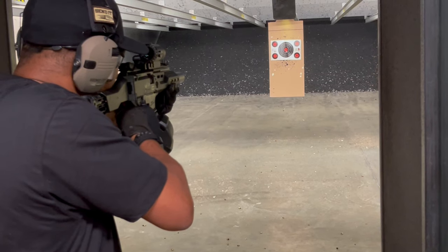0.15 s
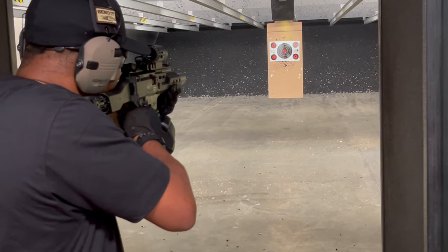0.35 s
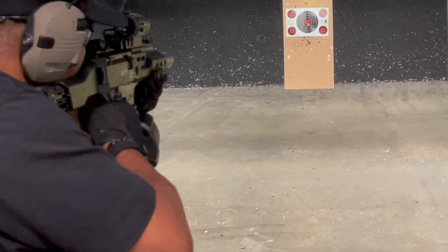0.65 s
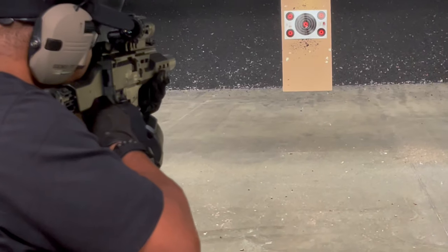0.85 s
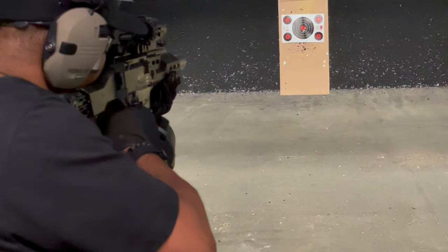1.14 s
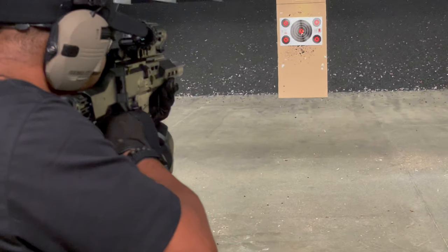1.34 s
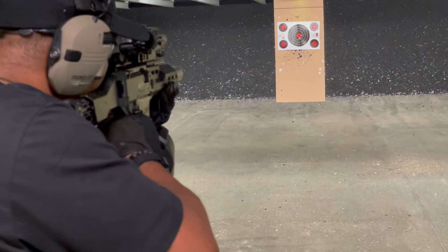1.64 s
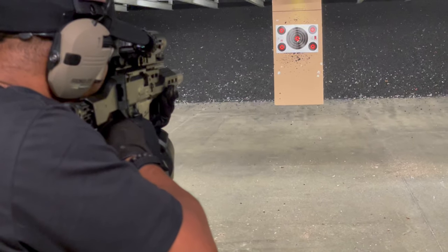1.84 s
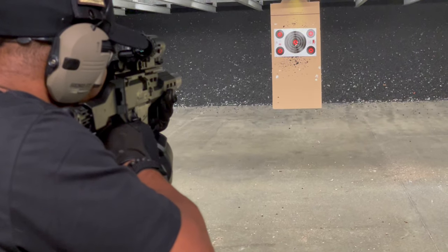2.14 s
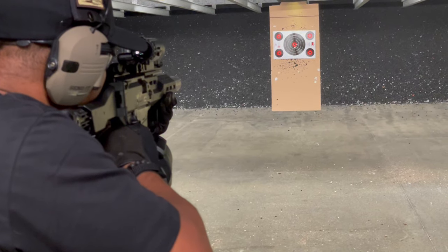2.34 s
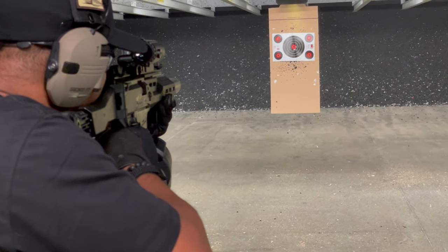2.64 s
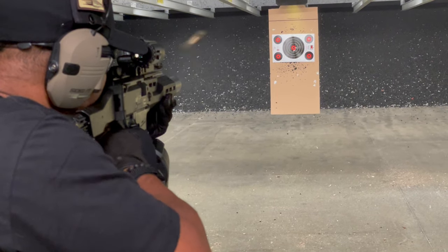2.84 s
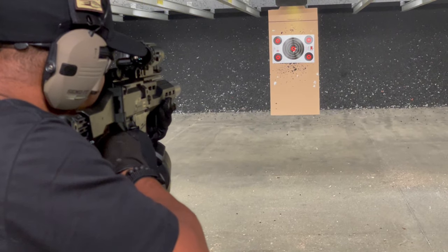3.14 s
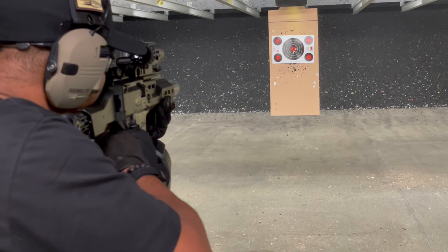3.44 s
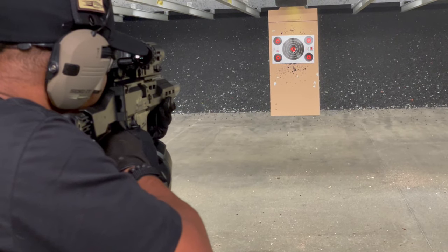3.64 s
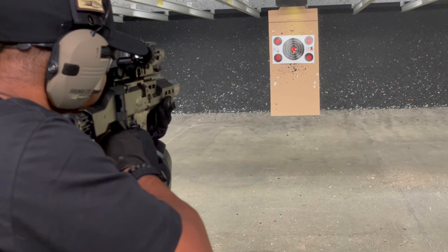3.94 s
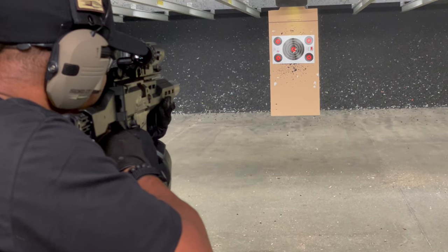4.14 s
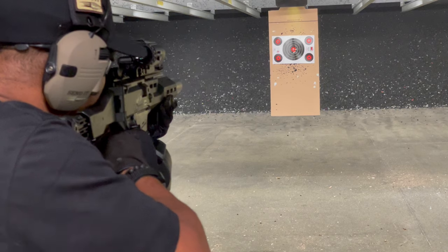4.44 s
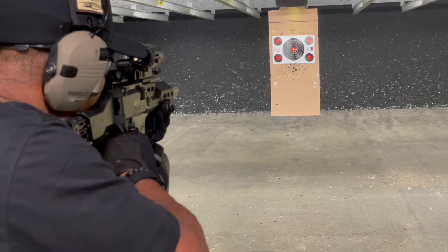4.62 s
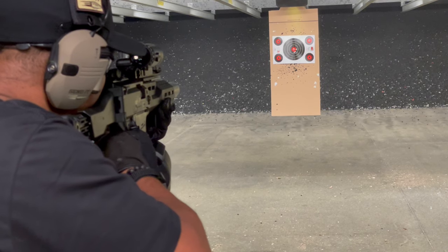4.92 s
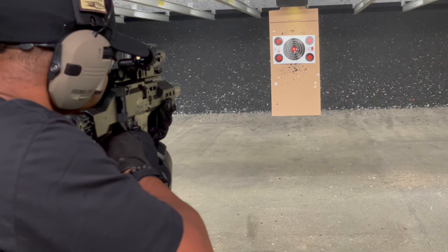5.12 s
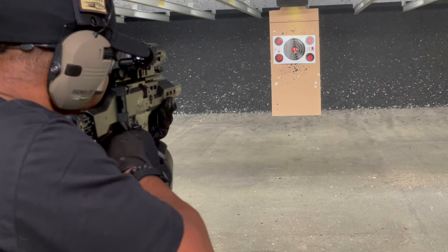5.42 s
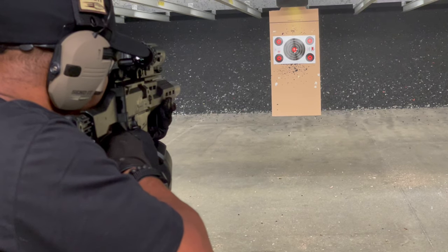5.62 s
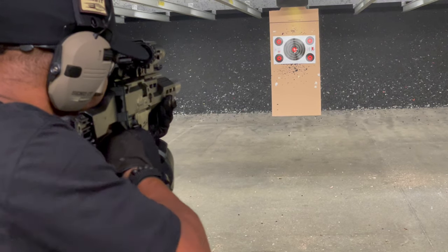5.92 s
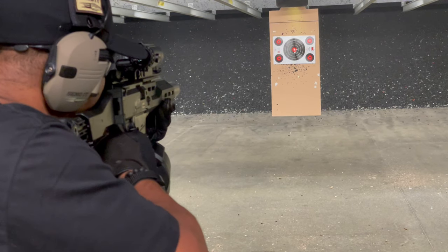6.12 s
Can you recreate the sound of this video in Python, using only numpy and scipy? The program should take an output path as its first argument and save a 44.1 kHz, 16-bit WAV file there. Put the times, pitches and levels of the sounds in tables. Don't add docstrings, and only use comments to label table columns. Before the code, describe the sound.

A hard, reverberant indoor shooting range, heard from beside the shooter on overloading stereo microphones, with low ventilation rush and fan hum throughout. At the start the tail of an earlier shot dies away while brass clicks on the floor and knocks a bench around 0.1 s, with smaller ticks to 0.55. A gun in another lane fires at 0.86, the near carbine cracks at 1.05, and the lane gun again at 1.16. Echoes slap and boom, then cases tick and ring brightly from 1.6 to 2.4. The carbine fires louder at 2.84, the lane gun at 3.0; high brass singing follows from 3.3, and a case rolls with a thin scrape at 4.0 to 4.3. The carbine fires at 4.36, slightly softer, then the lane gun at 4.74. More pings and a heavier clack fall at 5.0 to 5.8, before the final near blast at 5.88 rings out to the end.

```python
import sys
import numpy as np
from scipy import signal
from scipy.fft import rfft, irfft, next_fast_len
from scipy.io import wavfile
from scipy.ndimage import uniform_filter1d, map_coordinates

SR = 44100
rng = np.random.default_rng(int(sys.argv[2]) if len(sys.argv) > 2 else 0)


def persist_wave(psi):
    counts = np.round(np.clip(psi, -1, 1) * 32767).astype(np.int16)
    wavfile.write(sys.argv[1], SR, np.atleast_2d(counts).T)


def boost(x):
    u = np.asarray(x, float) / 20
    return 10 ** u


N = 276507

# (frequency [Hz], density [dB/Hz])
AIR_SPECTRUM = [(15, -60.5), (25, -30.5), (55, -5.5), (82, -9.5), (97, -19), (130, -17.5), (241, -22),
                (266, -32.5), (385, -31), (911, -37), (981, -39), (1320, -38.5), (9000, -64),
                (11700, -97.5), (19800, -120)]
# (frequency [Hz], level [dB])
FAN_ORDERS = [(64.6, -57), (129.2, -54.5), (193.8, -61.5), (387.6, -72), (608.3, -77.5), (958.2, -72)]

# (time [s], strength [dB])
NEAR_SHOTS = [
    (1.0536, -5),
    (2.838, -3.5),
    (4.3571, -5.5),
    (5.877, -3.5),
]
LANE_SHOTS = [
    (-.55, -3.5),
    (0.864, -4),
    (1.156, -5.5),
    (3.006, -5),
    (4.740, -3),
]
# (delay [s], level [dB], t60 [s], tilt [dB/octave])
NEAR_WALLS = [
    (0, -2, 0.13, 4),
    (.003, 7, .066, -1.5),
    (.0512, 3, .03, 0),
    (.055, 0, 0.053, 0.5),
    (.066, -17.5, 0.027, -4.5),
    (.1, -9.5, .07, 0),
    (0.138, -16, 0.22, 1.2),
]
LANE_WALLS = [
    (0, 9, 0.057, 1),
    (.007, 2.5, 0.16, 1),
    (.048, -13, 0.19, -0.5),
    (0.098, -25, 0.15, 0),
    (.175, -24.5, .3, -2.5),
    (0.204, -34.5, 0.13, -2),
]
# (frequency [Hz], density [dB/Hz])
NEAR_BLAST = [(24, -41), (40, -1), (85, 3), (150, -6), (234, -0.5), (580, -6.5), (1200, -7.5),
              (1570, -14.5), (1680, -11), (2960, -12.5), (9000, -18), (11700, -48), (19800, -120)]
LANE_BLAST = [(24, -29.5), (40, 6), (219, -1.5), (287, 1), (744, 0), (1090, -4), (1340, -5), (2900, -12.5),
              (9000, -17), (11700, -47), (19800, -120)]
# (frequency [Hz], density [dB/Hz])
NEAR_HALL = [(24, -42.5), (40, -4), (81, -10.5), (136, -10.5), (245, -3), (377, -4.5), (442, -3), (779, -5),
             (977, -7.5), (1970, -3.5), (2900, -5.5), (3800, -13.5), (9000, -14.5), (11700, -43),
             (19800, -120)]
LANE_HALL = [(24, -39), (40, -11), (81, -8.5), (174, -11), (229, -6.5), (262, -9.5), (452, -0.5),
             (933, -10.5), (1020, -13.5), (2110, -15), (9000, -26.5), (11700, -64), (19800, -120)]
# (frequency [Hz], t60 [s])
HALL_T60 = [(60, 1.5), (200, 1.1), (500, 0.84), (1200, 0.95), (3000, 0.68), (7000, 0.61), (12000, 0.48)]
# (frequency [Hz], level [dB], t60 [s])
BOOM_MODES = [(56.6, -25.5, 0.88), (82, -22.5, 1), (195.4, -25, 0.15)]
THUMP_S, THUMP_HZ, THUMP_T60_S, SINK_S = .0545, 81.6, 0.083, .006

# (struck [s], level [dB], flight [s])
SHORT_FLIGHTS = [(0, -83, 0.044), (.066, -67, 0.034), (.358, -68.5, .12), (1.559, -74, .05),
                 (1.615, -76, 0.23), (1.825, -62, 0.15), (2.0, -78, .1), (2.177, -67.5, .12),
                 (2.38, -59, 0.099), (2.476, -63, 0.11), (2.553, -67, .16), (2.74, -82.5, 0.086),
                 (3.334, -57, 0.22), (3.559, -58.5, .12), (3.73, -70, .08), (3.817, -67, 0.064),
                 (3.947, -62, 0.096), (5.058, -61.5, 0.12), (5.211, -67, 0.073), (5.275, -69, .16),
                 (5.44, -62, 0.12), (5.541, -66.5, 0.091)]
# (struck [s], level [dB], flight [s])
LONG_FLIGHTS = [(3.63, -73, 0.046), (4.985, -56.5, .12), (5.285, -68.5, .1), (5.385, -63, 0.042),
                (5.43, -55.5, 0.13), (5.572, -54, 0.082), (5.67, -62.5, .14)]
SHORT_HZ, LONG_HZ = 9800, 11770
SING_ATTACK_S, SING_T60_S, LANDING_S = 0.0013, 0.38, .012

# (time [s], peak [dB], tick centre [Hz], left-right [dB], thud [dB])
TICKS = [(0.07, -26, 6260, 2, -2.5), (0.1076, -31, 2740, -0.5, -2), (0.266, -55, 3870, 5, 5),
         (0.553, -49, 2190, -5, -6), (1.6149, -25.5, 6460, -3, -19), (1.8256, -23.5, 7900, 3, 2),
         (1.9157, -36.5, 4300, 2.5, 11.5), (2.1099, -30, 5870, 2.5, -3.5), (2.2672, -44.5, 3180, -1.0, -6),
         (2.3608, -42, 1303, 0.0, -5), (3.905, -28, 6900, 2, -7), (5.223, -22.5, 2530, 2, 1),
         (5.5426, -29, 6300, 2.5, -5)]
# (time [s], peak [dB], tick centre [Hz])
RIM_TICKS = [(0.338, -28, 10500), (0.5044, -52, 11500), (0.5117, -62, 11500), (1.329, -25, 7000),
             (1.719, -62.5, 9800), (2.154, -39.5, 9780), (2.3121, -39, 11460), (3.5583, -57, 9730),
             (3.686, -27, 11700), (3.9476, -35, 11150), (5.0592, -40.5, 9770), (5.1871, -52, 10930),
             (5.384, -54.5, 9900), (5.44, -40.5, 9640), (5.8128, -39, 11600)]
# (time [s], peak [dB], frequency [Hz], t60 [s])
RINGS = [(0.114, -43.5, 11620, 0.23), (0.511, -58, 11700, 0.27), (1.616, -69, 11300, 0.2),
         (1.918, -52, 11400, 0.3), (2.3112, -41, 11440, 0.28), (2.3301, -33, 11380, 0.077),
         (3.6849, -31, 11570, 0.188), (3.6985, -43, 11230, 0.089), (5.574, -54, 11750, 0.18),
         (5.8137, -38.5, 11520, 0.15)]
# (frequency [Hz], level [dB], t60 [s])
BENCH_MODES = [(1300, -13, 0.12), (2150, 0, 0.04), (2630, -4, 0.079), (3881, -15, 0.15), (3978, -17, 0.31)]
TICK_T60_S, RIM_T60_S, THUD_HZ = 0.057, .065, 1700
BOOTH_S, ECHO_T60_S = .007, .3
HEAVY_LASTS = 0.15
RIM_THUD_DB, THUD_FROM_DB, THUD_GROWS = -21, -49, 0.62

# (frequency [Hz], width [Hz], level [dB])
ROLL_MODES = [(3700, 60, -4), (4900, 60, 0), (6130, 27, -1.5), (6170, 130, -1), (7490, 67, 1),
              (8700, 65, 3.5), (9750, 27, -3), (11150, 250, -6.5)]
ROLL_FROM_S, ROLL_TO_S, ROLL_STOP_S = 3.995, 4.28, .03
ROLL_DB, ROLL_GROWS_DB_PER_S = -75, 12
TURN_S, TURN_AT_S = .043, .027

# (frequency [Hz], correlation [0-1])
LIKENESS = [(30, .8), (60, .84), (150, .88), (300, .86), (700, .85), (1400, .68), (2100, .9), (4500, .93),
            (5500, .995), (8300, .99), (9000, .85), (10300, .97), (12500, .9), (14000, .4)]
# (frequency [Hz], gain [dB])
MIC_RESPONSE = [(30, -10), (60, -1.5), (9000, 1.5), (11000, 4), (11800, -0.5), (12600, -6.5),
                (13300, -13.5), (15500, -13), (15800, -33.5)]
# (frequency [Hz], phase [rad])
PORT_LEAD = [(2000, 0), (3300, -.55), (5000, -.3), (5500, 0), (8500, 0), (9000, .6), (9650, 2.2),
             (10200, 3.15), (11000, 4.6), (11700, 5.9), (12400, 6.5), (13800, 9.4)]
SWELL_GRID_S, SWELL_GRID_START_S, LEAST_SWELL_S = 1024 / 48000, .0094, .005
SWELL_DB, SWELL_DB_PER_S = -37, 250


def unit(x):
    return x / np.sqrt(np.mean(x ** 2) + 1e-20)


def along(points, hz):
    f, v = np.transpose(points)
    return np.interp(np.log(hz + 1), np.log(f + 1), v)


def filtered(x, response):
    m = next_fast_len(x.shape[-1] + 4096)
    return irfft(rfft(x, m) * response(np.fft.rfftfreq(m, 1 / SR)), m)[..., :x.shape[-1]]


def stereo(pair):
    def mid_side(hz):
        turn = np.arccos(np.clip(along(LIKENESS, hz), -1, 1)) / 2
        return np.array([np.cos(turn), np.sin(turn)])

    mid, side = filtered(pair, mid_side)
    return np.array([mid + side, mid - side])


def add(out, x, s):
    i = round(s * SR)
    part = x[:, max(-i, 0):N - i]
    out[:, max(i, 0):max(i, 0) + part.shape[1]] += part


def spell(start, length, attack, release):
    t = np.arange(N) / SR - start
    opening = 1 - np.exp(-np.clip(t, 0, 1) / attack)
    return t, opening * np.exp(-(np.clip(t - length, 0, 1) / release) ** 2)


def ventilation():
    def colour(hz):
        whistle_db = 1.9 * np.exp(-((hz - 4000) / 500) ** 2)
        return boost(along(AIR_SPECTRUM, hz) + whistle_db)

    rush = unit(filtered(stereo(rng.standard_normal((2, N))), colour))
    t = np.arange(N) / SR
    drift = np.cumsum(rng.normal(0, 0.016, (len(FAN_ORDERS), N)), axis=1)
    ears = np.array([[.3], [-.3]])
    hum = sum(boost(db + 1.0) * np.sin(2 * np.pi * hz * t + d + ears)
              for (hz, db), d in zip(FAN_ORDERS, drift))
    return boost(-50.5) * rush + hum


def wall_returns(walls, hz, t):
    rise_s = .0004 + 1.6 / hz
    total = 0
    for delay, db, t60, tilt in walls:
        since = abs(t - delay)
        level_db = db + tilt * np.log2(hz / 2000)
        decay_db = 60 * (since / (t60 * (hz / 2000) ** -.12)) ** 1.157
        total = total + (t > delay) * boost(level_db - decay_db) * (1 - np.exp(-since / rise_s))
    return total


def low_boom(t, boom_db, thump_db):
    ears = np.array([[.33], [-.33]])
    boom = sum(boost(boom_db + db - 60 * t / t60) * np.sin(2 * np.pi * hz * t + ears)
               for hz, db, t60 in BOOM_MODES)
    late = np.clip(t - THUMP_S, 0, None)
    sunk = late + SINK_S * (1 - np.exp(-late / 0.0025))
    thump = boost(thump_db - 60 * late / THUMP_T60_S) * np.sin(2 * np.pi * THUMP_HZ * sunk)
    return boom * (1 - np.exp(-t / 0.012)) - thump


def gun(shots, walls, blast, hall, hall_db, boom_db, thump_db, fresh, swell, grain_db):
    def coloured(spectrum, x):
        return unit(filtered(x, lambda hz: boost(along(spectrum[:-2], hz))))

    out, t = np.zeros((2, N)), np.arange(4 * SR // 3) / SR
    centres = 45 * 2.0 ** np.arange(9)
    paths = rng.standard_normal((2, 2, len(t)))
    lumps = boost(grain_db * np.tanh(map_coordinates(rng.standard_normal(400), [t * 220])))
    shapes = []
    for hz in centres:
        uneven_db = 1.6 * map_coordinates(rng.standard_normal(60), [t * 35])
        tail = boost(uneven_db + hall_db - 60 * t / along(HALL_T60, hz))
        shapes.append([lumps * wall_returns(walls, hz, t), tail * (1 - np.exp(-(t / swell) ** 2))])
    boom = low_boom(t, boom_db, thump_db)
    octave = np.log2(np.clip(np.fft.rfftfreq(len(t), 1 / SR), centres[0], centres[-1]))
    for s, db in shots:
        noise = paths + fresh * rng.standard_normal(paths.shape)
        both = rfft([stereo(coloured(blast, noise[0])), stereo(coloured(hall, noise[1]))])
        shot = boom
        for hz, shape in zip(centres, shapes):
            band = irfft(both * np.clip(1 - abs(octave - np.log2(hz)), 0, 1), len(t))
            shot = shot + (band * np.array(shape)[:, None]).sum(axis=0)
        add(out, boost(db) * shot, s)
    return out


def singing(flights, hz, width_hz, gain_db):
    tone = unit(filtered(rng.standard_normal(N), lambda f: np.exp(-((f - hz) / width_hz) ** 2)))
    level = 0
    for s, db, flight in flights:
        t, gain = spell(s, flight, SING_ATTACK_S, LANDING_S)
        level = level + gain * boost(db - 60 * abs(t) / SING_T60_S)
    return boost(gain_db) * tone * level


def bounce(hz, thud_db, t60):
    t = np.arange(SR // 3) / SR
    patches = rng.standard_normal(40)

    def band(f, c):
        return (1j * f * 1.81 * c / (c * c - f * f + 1j * f * 2.33 * c)) ** 2

    def colour(f):
        tick = band(f, hz) / (1 + (f / (2.1 * hz)) ** 4)
        thud = boost(thud_db) * band(f, THUD_HZ)
        return (tick + thud) * boost(0.96 * map_coordinates(patches, [f / 600]))

    noise = stereo(rng.standard_normal((2, len(t))))
    slaps_db = 4 * np.cos(2 * np.pi * t / BOOTH_S)
    body_t60 = np.clip(t60 * boost(HEAVY_LASTS * thud_db), .01, .2)
    envelope = boost(-3 - 60 * t / 0.0036) + boost(-8 + slaps_db - 60 * t / body_t60)
    tick = filtered(noise * envelope, colour)
    echo = filtered(noise * boost(-19.5 - 60 * t / ECHO_T60_S), lambda f: colour(f) / (1 + (f / 8000) ** 4))
    return tick + echo


def landings():
    out = np.zeros((2, N))
    blows = [(*row, TICK_T60_S) for row in TICKS]
    for s, db, hz in RIM_TICKS:
        thud_db = RIM_THUD_DB + THUD_GROWS * max(db - THUD_FROM_DB, 0)
        blows.append((s, db, hz, 0, thud_db, RIM_T60_S))
    for s, db, hz, pan_db, thud_db, t60 in blows:
        pan = boost([[pan_db / 2], [-pan_db / 2]])
        add(out, boost(db + 0.5) * bounce(hz, thud_db, t60) * pan, s)
    return out


def ringing():
    out, t = np.zeros((2, N)), np.arange(SR // 3) / SR
    for s, db, hz, t60 in RINGS:
        tumble = 1 + 0.4 * np.sin(2 * np.pi * rng.uniform(11.6, 59) * t)
        tone = np.sin(2 * np.pi * hz * t + np.cumsum(rng.normal(0, 0.048, len(t))))
        buzz = unit(filtered(rng.standard_normal(len(t)), lambda f: np.exp(-((f - hz) / 400) ** 2)))
        envelope = boost(db - 60 * t / np.clip(t60, .03, 1)) * (1 - np.exp(-t / 0.00074))
        add(out, envelope * (tumble * tone + boost(-4 - 110 * t) * buzz)[None], s)
    return out


def bench_knock():
    out, t = np.zeros((2, N)), np.arange(SR // 3) / SR
    modes = [boost(db - 60 * t / t60) * np.sin(2 * np.pi * hz * t) for hz, db, t60 in BENCH_MODES]
    add(out, boost(-43) * sum(modes)[None], TICKS[1][0])
    add(out, boost(-47 - 900 * t) * sum(modes[-2:])[None], TICKS[2][0])
    return out


def rolling():
    def body(f):
        modes = sum(boost(db) * 1j * f * 2 * w / (c * c - f * f + 1j * f * 2 * w) for c, w, db in ROLL_MODES)
        return .6 * (f > 3500) + modes

    t, gain = spell(ROLL_FROM_S, ROLL_TO_S - ROLL_FROM_S, 0.047, ROLL_STOP_S)
    bumps_db = 5 * np.cos(2 * np.pi * (t - TURN_AT_S) / TURN_S) * np.clip(1.2 - 4 * t, .2, 1)
    level = boost(ROLL_DB + 3.5 + ROLL_GROWS_DB_PER_S * t + bumps_db)
    return gain * level * unit(filtered(stereo(rng.standard_normal((2, N))), body))


def scene():
    near = gun(NEAR_SHOTS, NEAR_WALLS, NEAR_BLAST, NEAR_HALL, hall_db=-2.5, boom_db=1.5,
               thump_db=-2, fresh=0.99, swell=0.058, grain_db=5.0)
    lane = gun(LANE_SHOTS, LANE_WALLS, LANE_BLAST, LANE_HALL, hall_db=-8.5, boom_db=3.0,
               thump_db=-13.5, fresh=0.44, swell=0.11, grain_db=1.0)
    brass = landings() + ringing() + bench_knock() + rolling()
    brass += singing(SHORT_FLIGHTS, SHORT_HZ, 45, gain_db=11.0)
    brass += singing(LONG_FLIGHTS, LONG_HZ, 54, gain_db=0.5)
    return near * boost([[.4], [-.4]]) + lane * boost([[.3], [-.3]]) + brass + ventilation()


def faint_swells(x):
    out = np.zeros((2, N))
    for s, _ in sorted(NEAR_SHOTS + LANE_SHOTS)[1:]:
        length = LEAST_SWELL_S + (s - SWELL_GRID_START_S - LEAST_SWELL_S) % SWELL_GRID_S
        t = np.arange(round(length * SR)) / SR
        hz = np.cumsum(250 + rng.exponential(750, (7, 1)), axis=0)
        tones = np.sin(2 * np.pi * (hz * t + rng.random(hz.shape)))
        tones = tones * boost(rng.normal(0, 3, hz.shape) - hz / 450)
        swell = (.3 + (t / length) ** 3) * np.clip(t / .006, 0, 1)
        level = boost(SWELL_DB + SWELL_DB_PER_S * length)
        add(out, level * swell * tones.sum(axis=0)[None], s - length)
    return x + out


def thinned(x, quiet_db, side_db, mid_db, mask_db, jump_db):
    hz, _, z = signal.stft([x[0] + x[1], x[0] - x[1]], SR, nperseg=1024)
    power = (abs(z[:, :512]) ** 2).reshape(2, 64, 8, -1).mean(axis=2)
    power = np.repeat(power, 8, axis=1)
    power = uniform_filter1d(np.concatenate([power, power[:, -1:]], axis=1), size=2, axis=2)
    both, hz_column = power.sum(axis=0), hz[:, None]
    top = hz_column > 13050
    memory = signal.lfilter([.06], [1, -.94], both, axis=1)
    attack = both > boost(2 * jump_db) * memory
    rising_db = 14 * np.clip(hz_column / 1000 - 11.8, 0, 1.3) * ~top - 34 * top
    masker = both[(hz > 300) & (hz < 4000)].mean(axis=0)
    threshold = boost(2 * rising_db) * (boost(2 * quiet_db) + boost(2 * mask_db) * masker)
    keep = (both > threshold) | (hz_column < 9990)
    keep &= ~top | attack
    keep_side = keep & ((power[1] > boost(2 * side_db) * power[0]) | (hz_column < 4000))
    keep_mid = keep & ((power[0] > boost(2 * mid_db) * power[1]) | attack)
    mid, side = signal.istft(z * [keep_mid, keep_side], SR, nperseg=1024)[1][:, :N] / 2
    return np.array([mid + side, mid - side])


def low_pass(x):
    return signal.sosfilt(signal.butter(12, 15610, fs=SR, output="sos"), x)


def record(dry):
    def ports(hz):
        lead = np.array([[-.5j], [.5j]]) * along(PORT_LEAD, hz)
        return boost(along(MIC_RESPONSE, hz)) * np.exp(lead)

    squeezed = dry / (1 + abs(dry / 1.1) ** 4) ** (1 / 4)
    heard = faint_swells(filtered(squeezed, ports))
    mix = thinned(heard, quiet_db=-92, side_db=-15.0, mid_db=-10, mask_db=-35, jump_db=-0.1)
    return low_pass(mix)


dry = scene()
out = record(dry)
persist_wave(out)
```